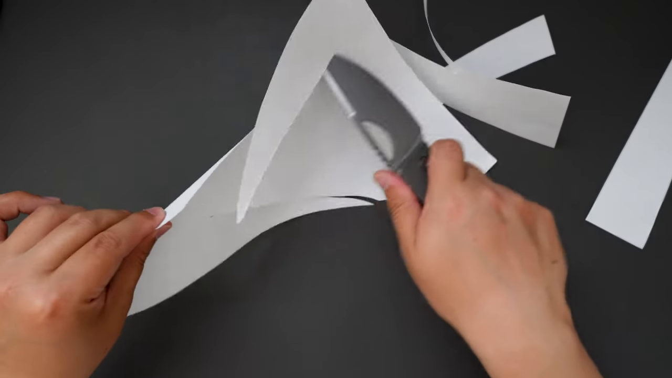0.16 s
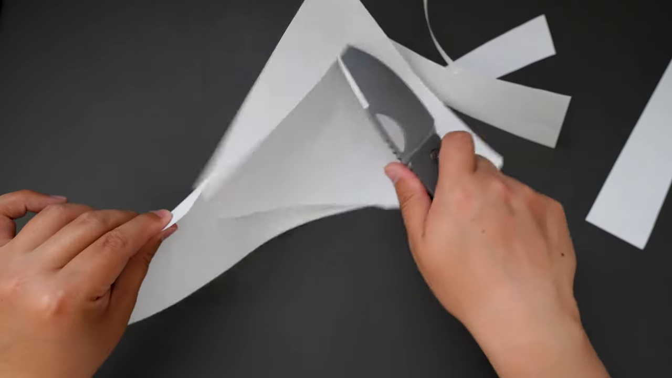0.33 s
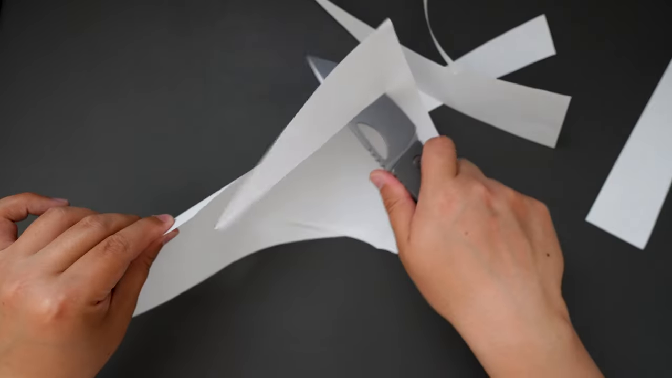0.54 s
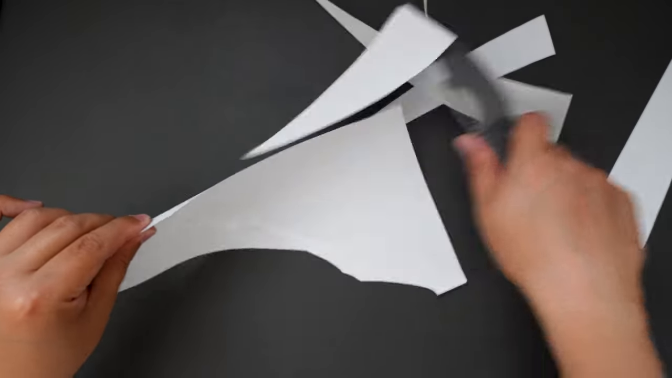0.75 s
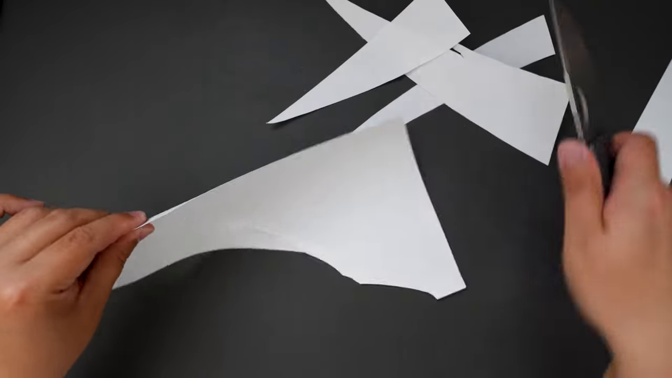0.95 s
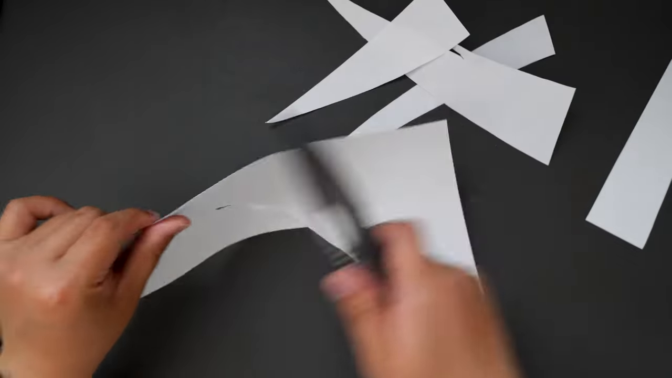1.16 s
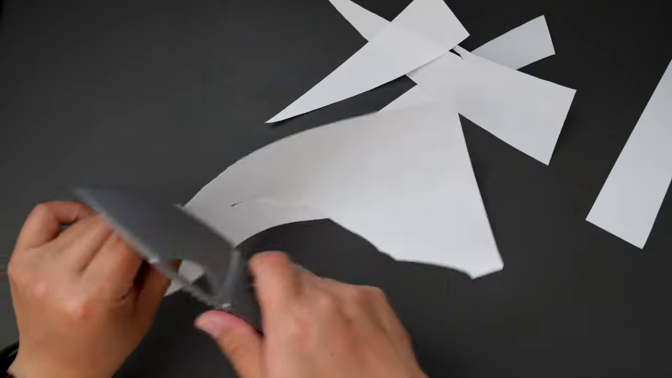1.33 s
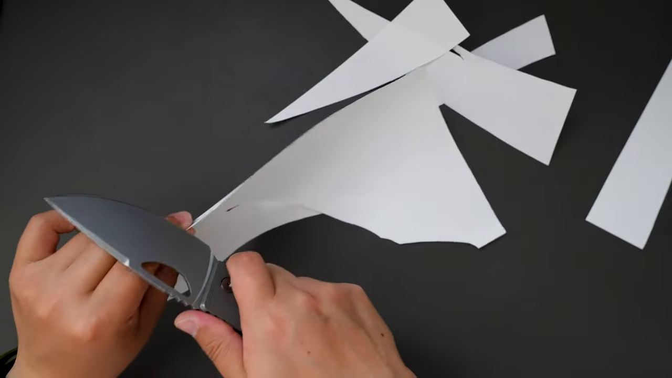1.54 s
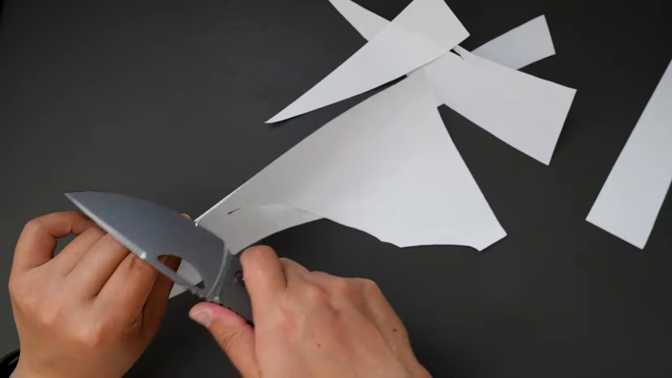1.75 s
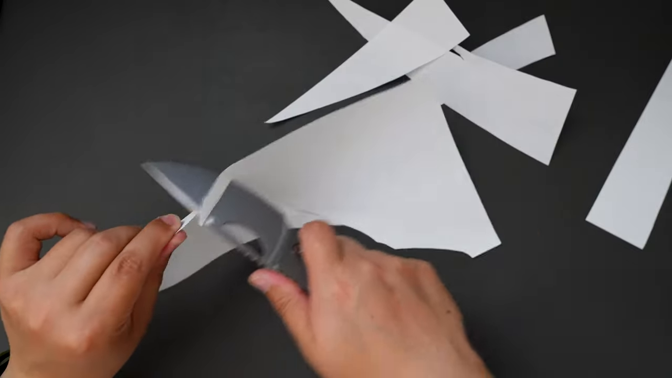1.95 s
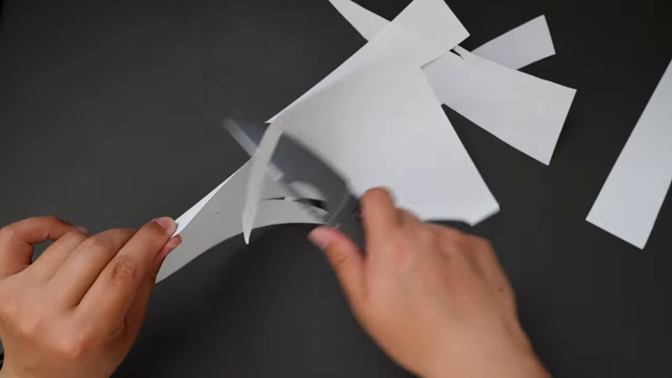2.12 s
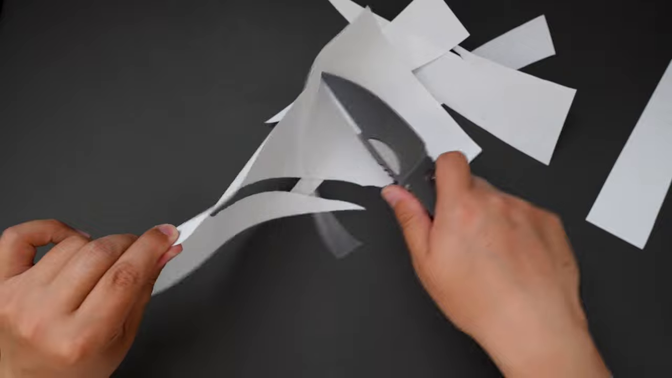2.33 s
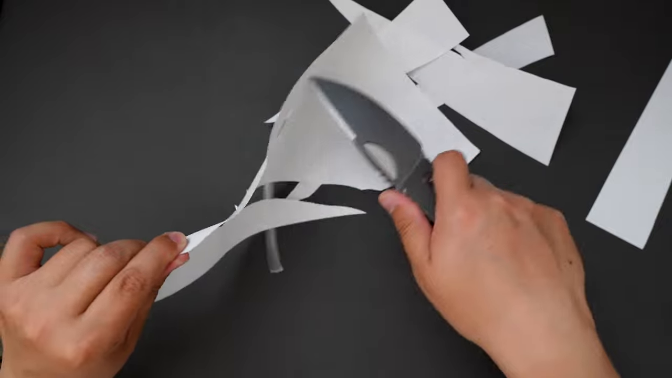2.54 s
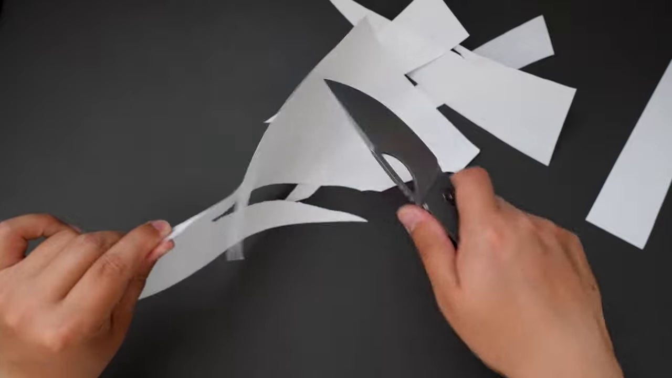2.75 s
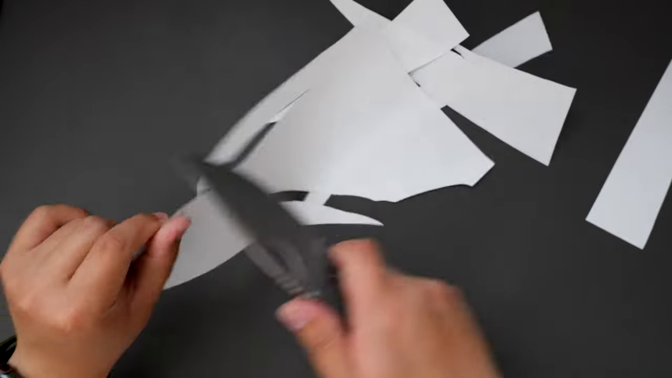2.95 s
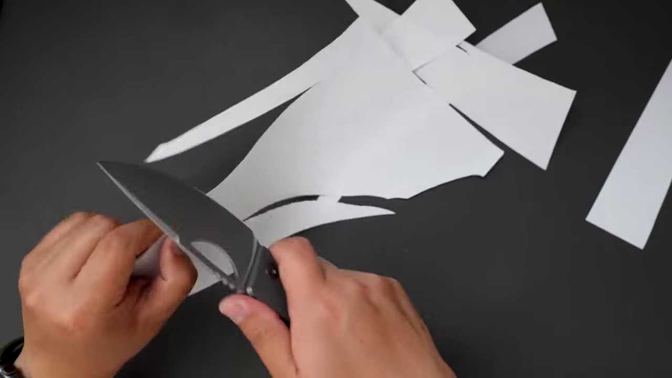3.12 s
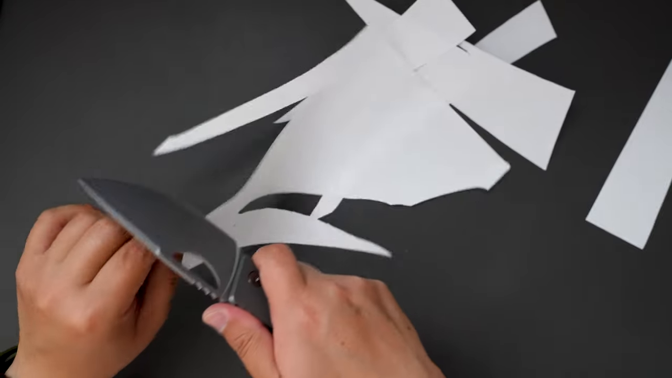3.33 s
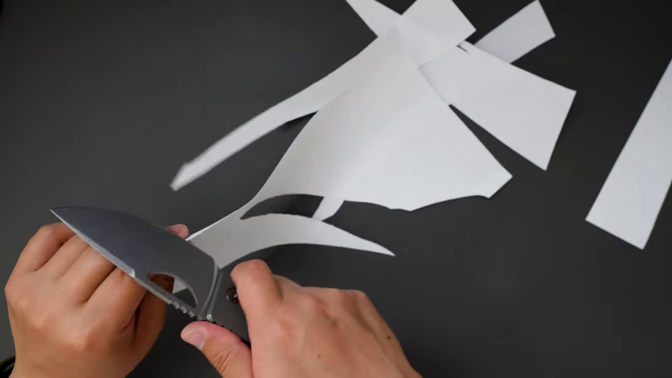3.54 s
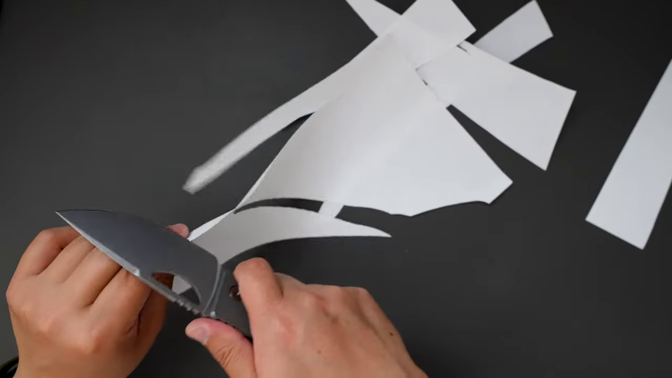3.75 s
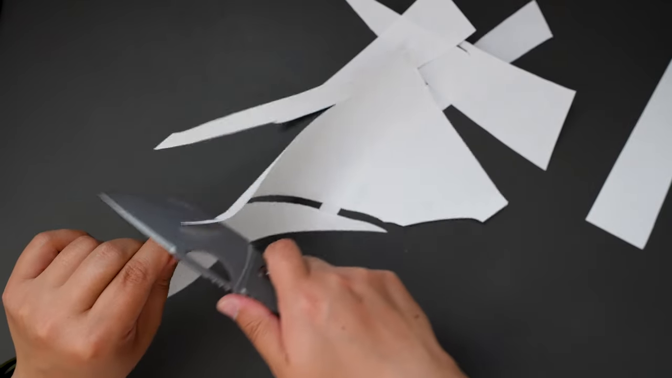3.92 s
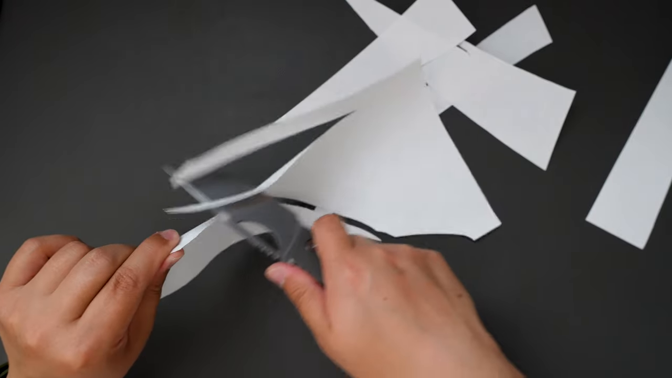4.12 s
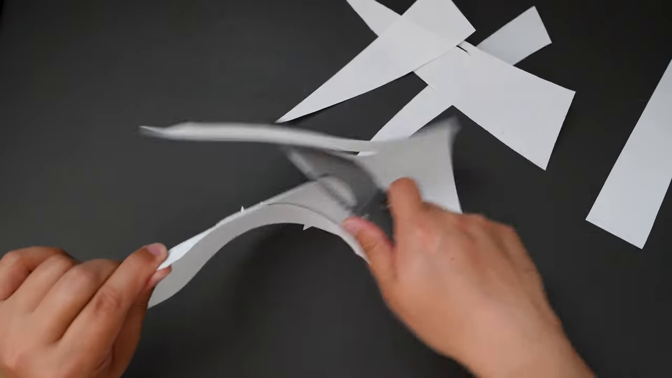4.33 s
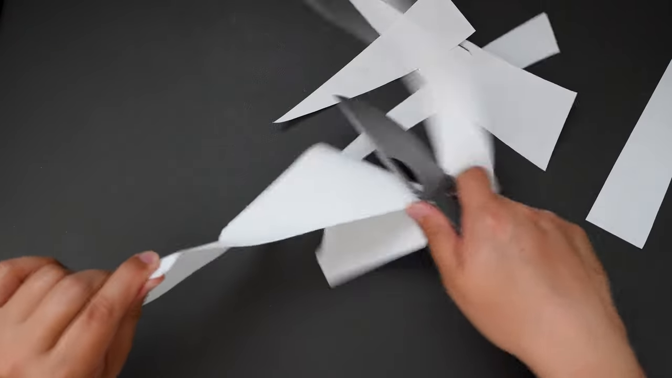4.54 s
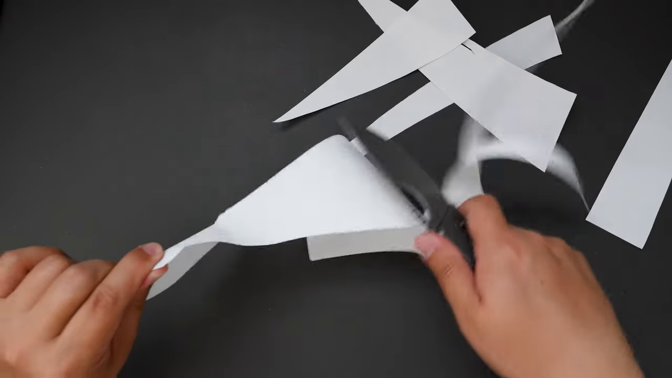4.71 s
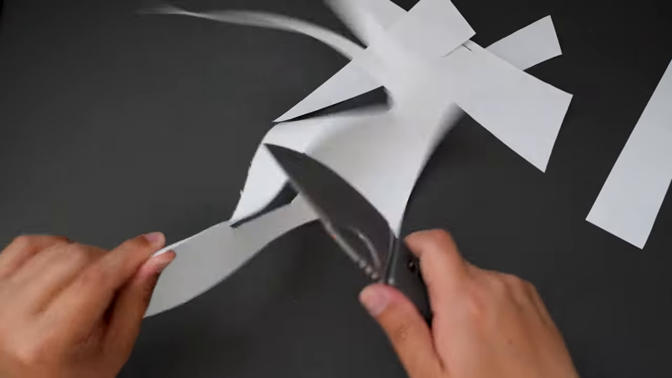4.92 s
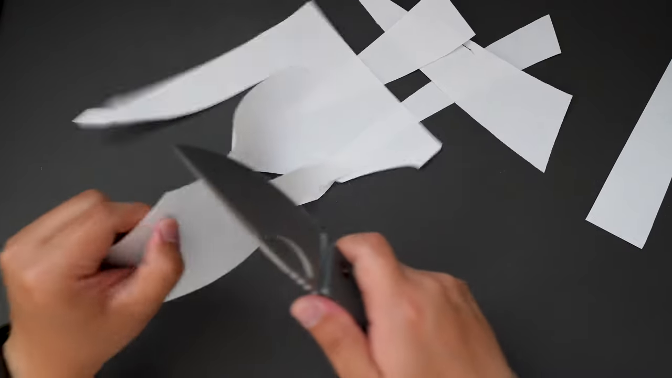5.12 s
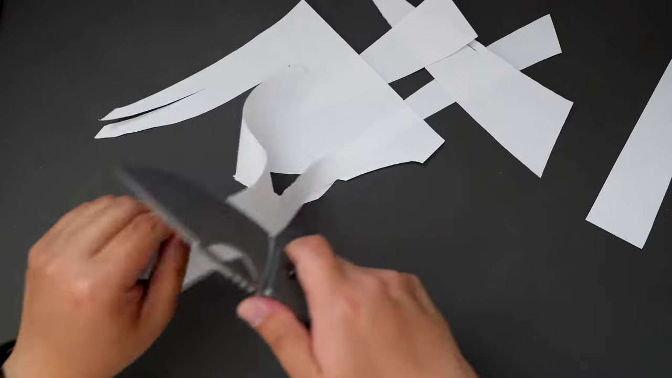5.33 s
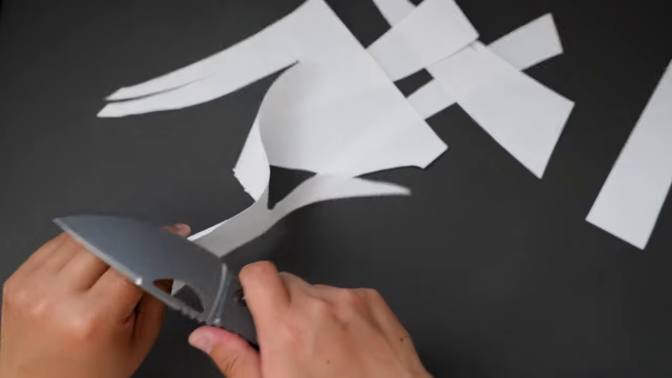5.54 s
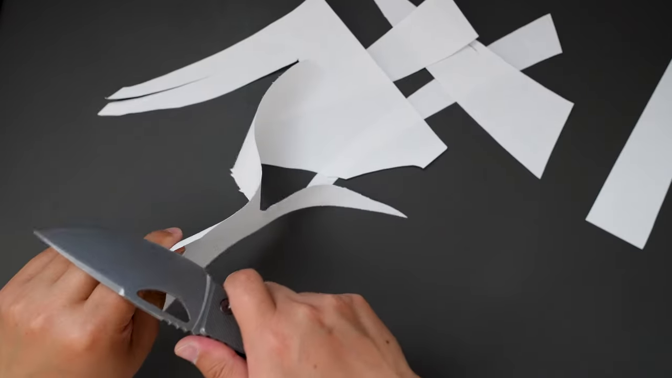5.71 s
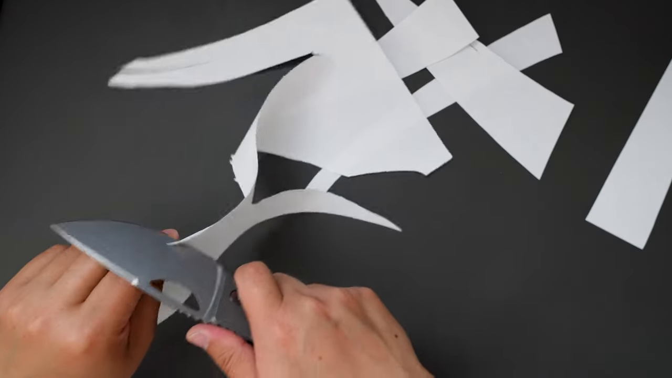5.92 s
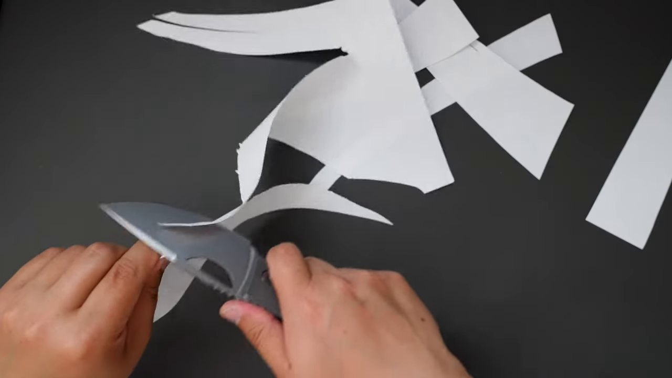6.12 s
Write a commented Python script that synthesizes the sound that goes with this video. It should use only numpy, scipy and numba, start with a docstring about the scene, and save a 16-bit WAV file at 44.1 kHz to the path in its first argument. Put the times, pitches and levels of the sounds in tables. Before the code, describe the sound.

Close, dry paper slicing: several hissing blade strokes, the loudest ending in a tearing snap, with soft rustling and faint hum beneath.

```python
"""In a small quiet room a sharp knife slices a hand-held sheet of paper above a desk, close under a microphone.
Fibres snap as a dense train of random impulses, which rings the resonances of the bent sheet.
Between cuts fingers and offcuts rustle as softer, patchier grains, and creases tick as short struck modes.
The slack sheet flops as decaying low sines; shaped noise and a wavering mains hum lie underneath."""
import sys
import numpy as np
from scipy import signal
from scipy.fft import rfft, irfft
from scipy.io import wavfile
from scipy.ndimage import uniform_filter1d
from numba import njit

SR = 44100
rng = np.random.default_rng(int(sys.argv[2]) if len(sys.argv) > 2 else 0)


def unload_wav(signal):
    """Save mono or channel-first audio to the path in sys.argv[1] as 16-bit WAV at rate SR, clipped to [-1, 1]."""
    wavfile.write(
        sys.argv[1],
        SR,
        np.round(np.clip(np.atleast_2d(signal).T, -1, 1) * 32767).astype(np.int16),
    )


N = 272097
T = np.arange(N) / SR


def amp(db):
    """Level definition: the amplitude ratio of a level in dB."""
    return 10 ** (np.asarray(db) / 20)


def unit(x):
    """Normalisation: the signal scaled to an rms value of 1."""
    return x / np.sqrt(np.mean(x ** 2))


def decay(t, t60):
    """Exponential decay: the amplitude falls by 60 dB in t60 seconds."""
    return np.exp(-np.log(1000) * t / t60)


def band(x, lo_hz, hi_hz):
    """Band limitation: a fixed Butterworth band-pass."""
    edges_hz = [lo_hz, min(hi_hz, .45 * SR)]
    return signal.sosfilt(signal.butter(3, edges_hz, "bandpass", fs=SR, output="sos"), x)


def soften(x, hz):
    """Finite contact time: a one-pole low-pass spreads each snap over a few samples."""
    keep = np.exp(-2 * np.pi * hz / SR)
    return signal.lfilter([1 - keep], [1, -keep], x)


@njit
def svf(x, hz, width):
    """Resonance: a state-variable band-pass with a moving centre and a gain of 1 there."""
    y, band_state, low_state = np.empty(len(x)), 0., 0.
    for i in range(len(x)):
        g = np.tan(np.pi * hz[i] / SR)
        k = width / hz[i]
        v = (band_state + g * (x[i] - low_state)) / (1 + g * (g + k))
        band_state = 2 * v - band_state
        low_state += 2 * g * v
        y[i] = k * v
    return y


def walk(rate, size):
    """Slow random modulation: levels held for 1 / rate s and smoothed twice, with a spread near 1."""
    hold = int(SR / rate)
    held = np.repeat(rng.standard_normal(size // hold + 1), hold)
    smooth = uniform_filter1d(uniform_filter1d(held, hold), hold)
    return 1.26 * smooth[:size]


def grains(per_s, scatter_db, size):
    """Impulsive (shot) noise: random one-sample snaps, a few much larger than the rest."""
    chance = rng.random((3, size))
    present = chance[0] < per_s / SR
    sign = np.sign(chance[1] - .5)
    level_db = np.minimum(-scatter_db * np.log(1 - chance[2]), 12)
    return present * sign * amp(level_db)


def patchy(x, rate, depth):
    """Incoherent radiation: neighbouring bands vary alone as different parts of the paper radiate."""
    centres_hz = 500 * 1.25 ** np.arange(16)
    patches = [depth * walk(rate, size=len(x)) * svf(x, np.full(len(x), hz), hz / 6) for hz in centres_hz]
    return x + sum(patches)


def desk_echo(x, delay_ms, share):
    """Dipole and reflection: the sheet's back, in opposite phase, arrives late and duller via the desk."""
    at = np.arange(len(x))
    dull = soften(x, 2500)
    # the path shifts as the sheet moves
    reflected = np.interp(at - delay_ms * SR / 1000, at, dull)
    return x - share * reflected


def played(x, bands):
    """Spectral shaping: each (low Hz, high Hz, gain over time) band is set to its own level."""
    return sum(unit(band(x, lo, hi)) * gain for lo, hi, gain in bands)


# spectrum of the air and appliance noise: pitch_hz [Hz], level_db [dB per Hz, relative]
ROOM_SPECTRUM = [(15, -32), (26, 6), (129, -4.5), (183, 1.5), (288, -3), (408, -9), (716, -12), (818, -16),
                 (1730, -21.5), (4070, -17), (15500, -32.5)]
# components of the mains hum: pitch_hz [Hz], level_db [dB, sine peak]
HUM_TONES = [(59, -66), (120, -55.5), (186, -67.5)]
AIR_DB = -51.5  # rms


def room():
    """Stationary noise and phase modulation: soft air and appliance noise, with a wavering mains hum."""
    pitch_hz, level_db = np.transpose(ROOM_SPECTRUM)
    f = np.maximum(np.arange(N // 2 + 1) * SR / N, 1)
    shape = amp(np.interp(np.log(f), np.log(pitch_hz), level_db))
    air = irfft(rfft(rng.standard_normal(N)) * shape, N)
    hum = sum(amp(db) * np.sin(2 * np.pi * hz * T + 1.8 * walk(3.02, size=N)) for hz, db in HUM_TONES)
    return amp(AIR_DB) * unit(air) + hum


def gate(t, start, end, rise, fall):
    """Power-linear envelope: the sound opens at the start and shuts at the end, evenly in power."""
    return np.sqrt(np.clip((t - start) / rise, 0, 1) * np.clip((end - t) / fall, 0, 1))


SHEET_Q = 30  # adds pitch / Q to the width of each sheet mode
BODY_FOLLOWS = 0.81  # dB that the body moves for each dB of rasp


def cut(rows, body_db, modes, span):
    """Impulse-excited resonance: fibres part one by one; the sheet's modes slide and swell as the strip peels."""
    t = T[int(span[0] * SR):int(span[1] * SR)]
    grip = amp(1.2 * walk(75, size=len(t)))
    snaps = soften(grains(12000, 2.2, size=len(t)), 12700) * grip
    broad = patchy(snaps, 15, .45)
    delay_ms = 0.905 + 0.12 * walk(1.9, size=len(t))
    sheet = amp(1.5) * desk_echo(broad, delay_ms, 0.71)
    for hz, width, db in modes:
        slide = 1 + 0.026 * walk(13.6, size=len(t))
        swell = amp(db + 1.54 * walk(16.2, size=len(t)))
        sheet = sheet + swell * svf(snaps, hz * slide, width + hz / SHEET_Q)
    s, rasp, flap, edge = np.transpose(rows)
    body = rasp.max() + body_db + BODY_FOLLOWS * (rasp - rasp.max())
    flap, edge = rasp + flap, rasp + edge
    levels = [(110, 270, flap - 13), (270, 1000, flap), (1000, 2300, body), (2300, 7000, rasp),
              (7000, 15000, edge)]
    bands = [(lo, hi, amp(np.interp(t, s, db))) for lo, hi, db in levels]
    return played(sheet, bands) * gate(t, *span)


# time limits of each cut: start_s, end_s, rise_s, fall_s [s]
# the long fourth cut turns into a tearing finish, the fifth row, with the sheet bent anew
CUT_TIMES = [(0, .4, .002, .035), (.612, .78, .002, .035), (1.775, 2.46, .002, .035),
             (3.845, 4.46, .002, .12), (4.34, 4.8, .12, .035), (5.94, 6.2, .002, .035)]
# level curve of each cut: time_s [s], rasp_db at 2.3-7 kHz [dB],
# flap_db under 1 kHz and edge_db of the hiss over 7 kHz [dB relative to the rasp]
CUT_CURVES = [
    [(0, -23, -12.5, -12), (.042, -25.5, -8, -7), (.07, -27.5, -12, -12), (.16, -28.5, -9, -7),
     (.29, -33.5, -6, -7.5), (.37, -40, 0.5, -7), (.4, -61, -9, -11)],
    [(.614, -31.5, -11, -6), (.65, -24, -19, -8.5), (.728, -29, -7, -2.5), (.752, -55, -6, -2),
     (.78, -24, -18, -7)],
    [(1.777, -43.5, -4, -3), (1.813, -35, -0.5, -7), (1.93, -27, -5.5, -2), (2.13, -24, -9, -7),
     (2.31, -27.5, -4.5, -6.5), (2.395, -28.5, -9, -5.5), (2.46, -45.5, -20, -6)],
    [(3.847, -30.5, -7.5, -7), (3.883, -28.5, -11.5, -4.5), (4.0, -21.5, -10.5, -7),
     (4.13, -20.5, -16.5, -7), (4.18, -21, -5, -5), (4.36, -24, -11.5, -3), (4.45, -13, -15, -5)],
    [(4.36, -24, -12, -4), (4.475, -18.5, -14, -6.5), (4.503, -13, -13, -4.5), (4.535, -26.5, -7, -7),
     (4.561, -29, -11, -6), (4.598, -18.5, -9, -5), (4.67, -29.5, -9, 3.5), (4.695, -29, -8.5, 1),
     (4.723, -39.5, -19, -4), (4.8, -42, 1, -6)],
    [(5.942, -35.5, 2.5, -3), (5.972, -27, -19, -2.5), (6.03, -30, -13, -2.5), (6.06, -30, -14, 0.5),
     (6.128, -32, -12, -3.5), (6.17, -29.5, -16, -4)],
]
# sheet body at 1-2.3 kHz in each cut, at its loudest rasp: body_db [dB relative to that rasp]
CUT_BODIES = [-4, -5, -2, -7, -7.5, -8.5]
# resonances of the sheet as held and bent in each cut:
# pitch_hz [Hz], width_hz [Hz, before the SHEET_Q share], level_db [dB, relative, before the band levels]
SHEET_MODES = [
    [(1670, 63, 6), (2190, 170, 1.5), (4350, 35, 1), (5140, 58, -17), (6700, 92, -30)],
    [(1670, 170, 9), (3340, 36, 6), (5470, 210, 5.5), (7640, 120, -26), (10530, 48, 11), (10900, 34, 12)],
    [(590, 100, -7), (1650, 78, 2.5), (2140, 29, -7), (3330, 54, -11), (4420, 100, -3), (7100, 770, -7)],
    [(436, 15, -6), (1760, 95, -19), (2740, 190, 4.5), (3390, 150, 7), (4180, 540, 7), (6150, 80, -9),
     (7170, 210, 4)],
    [(4200, 140, 0), (4900, 290, 2), (6700, 140, 1), (7400, 39, -5)],
    [(2860, 36, 8.5), (4900, 170, 0.5), (6150, 41, -19), (7400, 250, -24), (8000, 260, -3)],
]


def cuts():
    """Superposition: the cuts add in time, each with its own modes for the way the sheet is bent."""
    out = np.zeros(N)
    for rows, body_db, modes, span in zip(CUT_CURVES, CUT_BODIES, SHEET_MODES, CUT_TIMES):
        sound = cut(rows, body_db, modes, span)
        out[int(span[0] * SR):][:len(sound)] += sound
    return out


RUSTLE_FALL_DB_PER_S = 504
# paper sliding on skin and desk: start_s [s], length_s [s], swell before the start [dB per s],
# start_db and end_db at 3-8 kHz [dB], air_db over 8 kHz and body_db at 0.3-3 kHz [dB relative to these]
SLIDES = [(0.467, 0.091, 156, -40, -45, -5.5, -12), (0.58, 0.027, 200, -52, -47, -15, -12),
          (0.763, 0.14, 500, -45, -51, -8, -5.5), (0.907, 0.04, 300, -55, -55, -11, -6),
          (1.098, 0.28, 170, -43.5, -47, -8, -7), (1.426, 0.092, 300, -41, -45, -12, -7.5),
          (2.438, 0.13, 500, -48.5, -55, -11, 4), (2.598, 0.066, 200, -39, -40.5, -13, -9.5),
          (2.732, 0.011, 400, -45, -50, -11, -4), (2.957, 0.17, 190, -43, -49.5, -7.5, -5.5),
          (3.148, 0.019, 500, -47.5, -44.5, -9.5, -8), (3.2, 0.092, 500, -53, -48.5, -9, -9),
          (3.36, .02, 250, -44, -50, -11, -9), (3.432, .05, 600, -48, -54.5, -9, -14),
          (3.717, 0.026, 500, -48.5, -61, -10, -9), (3.839, 0.0071, 700, -49, -41, -11, -2),
          (4.788, 0.13, 500, -45.5, -51.5, -4, -6.5), (4.946, .14, 200, -45.5, -41, -5, -11),
          (5.116, 0.12, 602, -42, -46.5, -7.5, -5.5), (5.265, 0.027, 400, -46, -47.5, -7, -6.5),
          (5.351, 0.025, 900, -39, -52, -9, -15), (5.416, 0.019, 300, -44, -47.5, -7, -3),
          (5.533, 0.03, 250, -44, -48, -4.5, -13), (5.6, .06, 300, -51, -56, -7, -13),
          (5.682, 0.036, 600, -43.5, -58, -7, -10), (5.775, 0.0097, 700, -44, -53, -9, -18),
          (5.933, .015, 350, -44, -46, -5.5, -9)]


def rustle():
    """Friction noise: soft, patchy grains of rubbing paper; each slide swells in, drifts and dies away."""
    grip = amp(1.9 * walk(60, size=N))
    rub = patchy(soften(grains(9000, 2.5, size=N), 5000) * grip, 20, .4)
    sound = desk_echo(rub, 0.932 + 0.1 * walk(8.6, size=N), 0.57)
    power = np.zeros((3, N))
    for s, length, swell, start_db, end_db, air_db, body_db in SLIDES:
        before, after = np.maximum(s - T, 0), np.maximum(T - s - length, 0)
        fade_db = swell * before + RUSTLE_FALL_DB_PER_S * after
        level_db = np.interp(T, [s, s + length], [start_db, end_db]) - fade_db
        power += np.outer(amp([body_db, 0, air_db]), amp(level_db)) ** 2
    body, slide, air = np.sqrt(power)
    return played(sound, [(300, 3000, body), (3000, 8000, slide), (8000, 14000, air)])


TICK_T60_S, SNAP_T60_S = 0.051, 0.053  # decay of the crackle; added decay of the modes over 1 kHz
# creases popping and edges tapping: start_s [s], body_db under 1 kHz, snap_db at 1-4.4 kHz,
# crack_db over 4.4 kHz [dB, peak of the 2 ms mean magnitude before the final halving]
CREASES = [(0.492, -32.5, -45, -30), (0.806, -25.5, -23, -41), (0.834, -56, -39, -34),
           (0.877, -52, -45, -37), (1.06, -38, -49, -41), (1.18, -38.5, -45, -38), (1.391, -32.5, -55, -43),
           (1.692, -35, -48, -39.5), (2.335, -21, -8.5, -12), (2.509, -33, -37, -34.5),
           (2.742, -37, -30.5, -35), (2.972, -36.5, -38, -36.5), (3.125, -31, -31.5, -52),
           (3.233, -34.5, -52, -55), (3.404, -27, -30.5, -41), (3.668, -45.5, -46, -54),
           (4.688, -25, -32, -17.5), (4.905, -33.5, -48, -42), (4.998, -31.5, -38, -33),
           (5.121, -45, -39, -28), (5.133, -30, -34, -38), (5.2185, -34, -29, -43), (5.265, -43, -40, -41),
           (5.346, -40, -47, -54), (5.4255, -24, -41, -45), (5.665, -50, -44.5, -42),
           (5.77, -40, -34.5, -28.5), (5.838, -42, -44, -42), (5.889, -27, -47, -46),
           (6.032, -24, -24, -37)]
# broad modes of the paper: pitch_hz [Hz], width_hz [Hz], level_db [dB, relative within each range]
PAPER_MODES = [(343, 355, -10), (537, 120, -10.5), (1250, 100, -6), (1760, 550, 16.5), (2570, 360, 13.5),
               (3430, 300, 10.5), (5200, 1130, 17), (7100, 2500, -9)]


def ticks():
    """Modal excitation: a sharp push and brief crackle ring broad modes, with new strengths each tick."""
    out, t = np.zeros(N + 4096), T[:4096]
    for s, body_db, snap_db, crack_db in CREASES:
        push = grains(7000, 2.5, size=len(t)) * decay(t, TICK_T60_S) * np.clip(t / .003, 0, 1)
        push[80] += 2  # the sharp push, 1.8 ms in
        shift = rng.standard_normal((len(PAPER_MODES), 2))
        tick = np.zeros((3, len(t)))  # body, snap, crack
        for (hz, width, mode_db), (a, b) in zip(PAPER_MODES, shift):
            part = int(hz > 1000) + int(hz > 4400)
            centre_hz = np.full(len(t), hz * (1 + 0.021 * b))
            tick[part] += amp(mode_db + 2 * a) * svf(push, centre_hz, float(width))
        tick[1:] *= decay(t, SNAP_T60_S)
        tick[:2] = band(tick[:2], 120, 4500)  # the lower modes carry no treble
        peak = uniform_filter1d(np.abs(tick), size=90).max(axis=1)
        gain = amp([body_db, snap_db, crack_db]) / peak
        out[int(s * SR):][:len(t)] += gain @ tick / 2
    return out[:N]


# the slack sheet pushing air at the microphone:
# start_s [s], level_db [dB, sine peak before decay], pitch_hz [Hz], t60_s [s]
SHEET_FLOPS = [(2.333, -27.5, 141, 0.089), (4.519, -37, 68, 0.15), (4.588, -27, 117, 0.15),
               (4.665, -28.5, 106, 0.083)]


def flops():
    """Damped oscillation: the slack sheet flops as soft low thumps, each a decaying sine."""
    out = np.zeros(N)
    for s, db, hz, t60 in SHEET_FLOPS:
        t = np.maximum(T - s, 0)
        onset = np.clip(t / 0.0016, 0, 1)
        out += amp(db) * np.sin(2 * np.pi * hz * t) * decay(t, t60) * onset
    return out


def walls(x, t60, wet_db):
    """Diffuse reverberation: convolution with decaying noise gives a short tail from the near walls."""
    t = T[:int(.4 * SR)]
    noise = band(rng.standard_normal(len(t)), 125, 6300)
    tail = noise * decay(t, t60) * (t > .004)
    tail = tail / np.sqrt(np.sum(tail ** 2))
    return x + amp(wet_db) * signal.fftconvolve(x, tail)[:N]


def scene():
    """Superposition: paper sounds with their wall tail add to the room, the same in both channels."""
    near = cuts() + rustle() + ticks() + flops()
    return np.tile(walls(near, 0.41, -15.0) + room(), (2, 1))


def record(dry):
    """Band limitation: the recorder cuts the top with a steep elliptic low-pass at 15.8 kHz."""
    return signal.sosfilt(signal.ellip(10, .2, 80, 15800, fs=SR, output="sos"), dry)


dry = scene()
out = record(dry)
unload_wav(out)
```